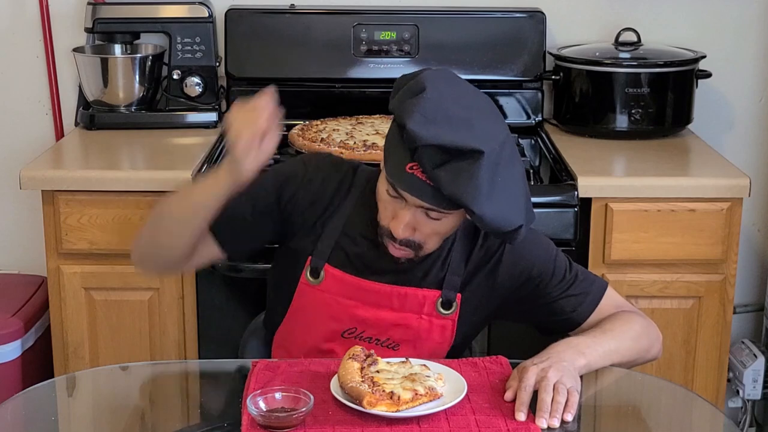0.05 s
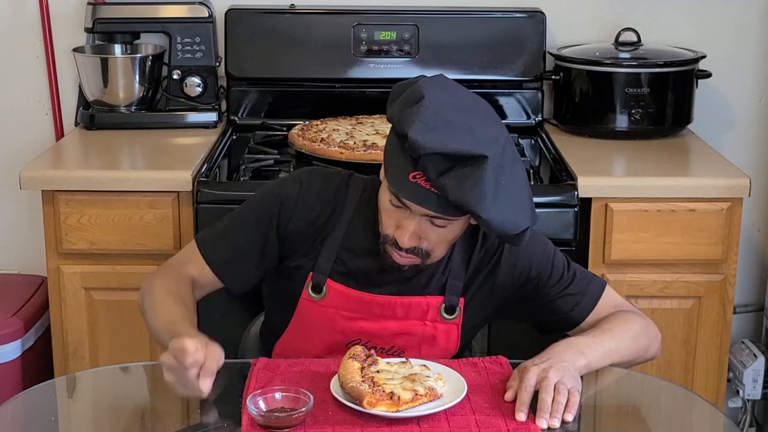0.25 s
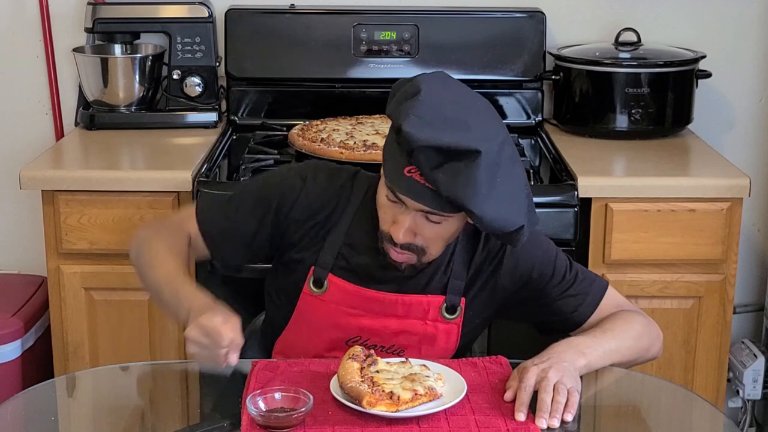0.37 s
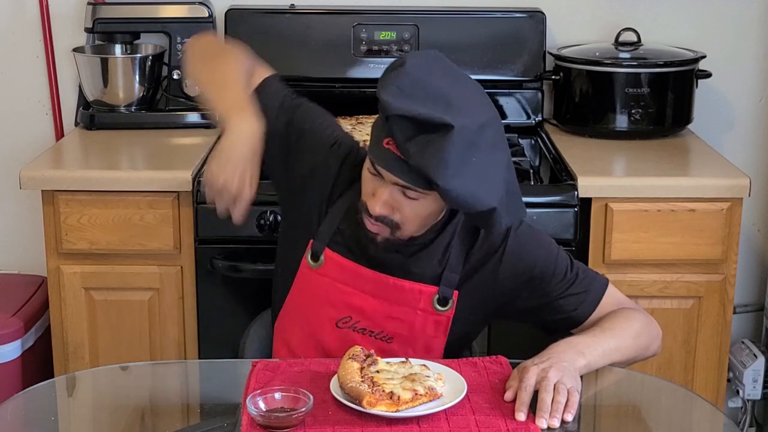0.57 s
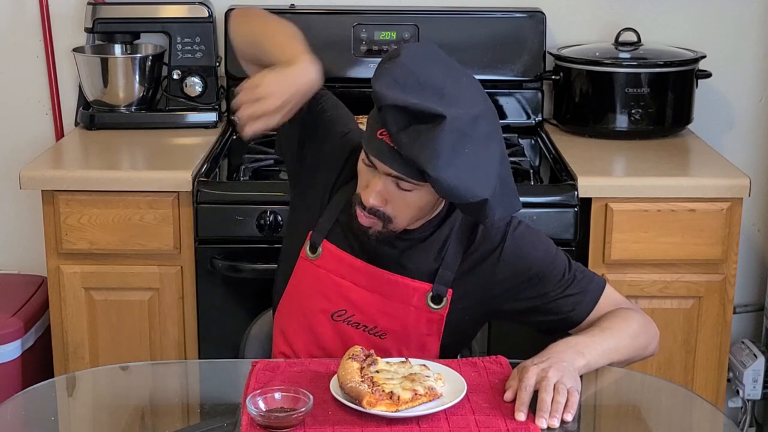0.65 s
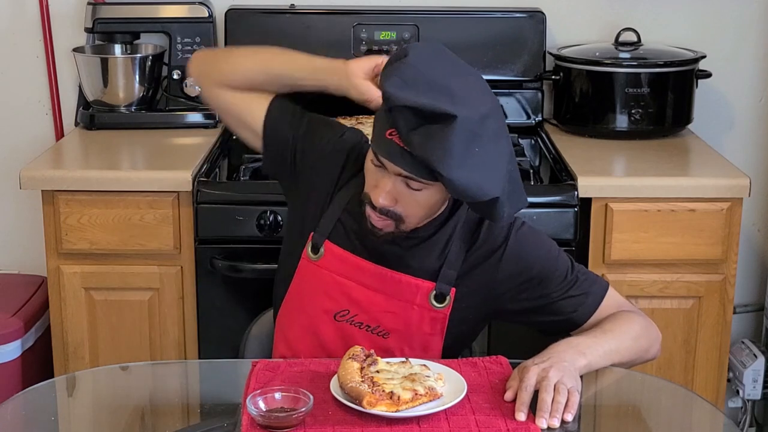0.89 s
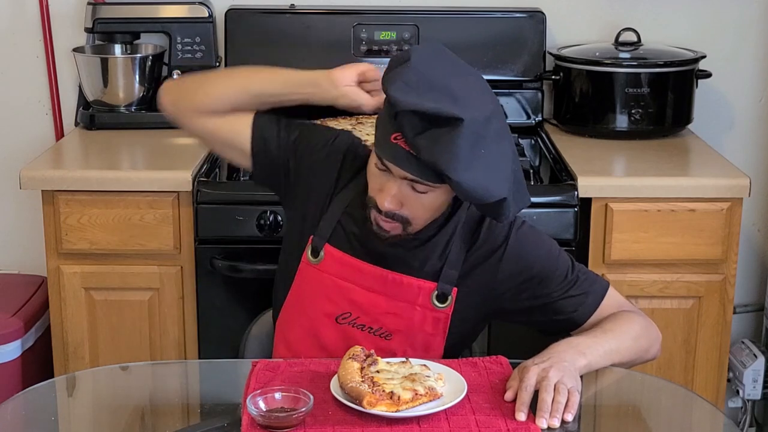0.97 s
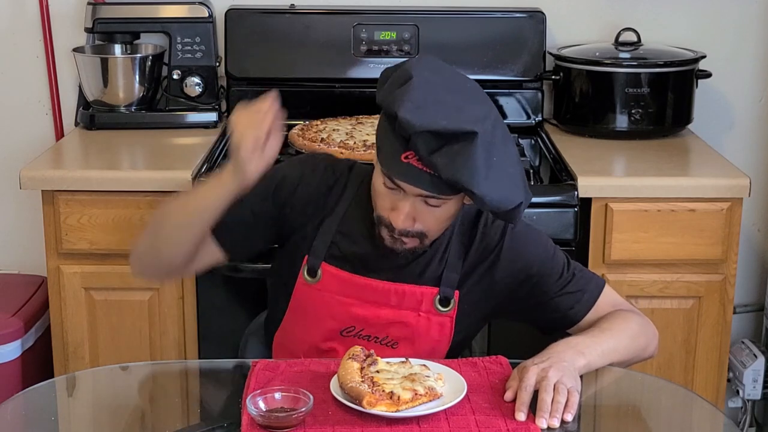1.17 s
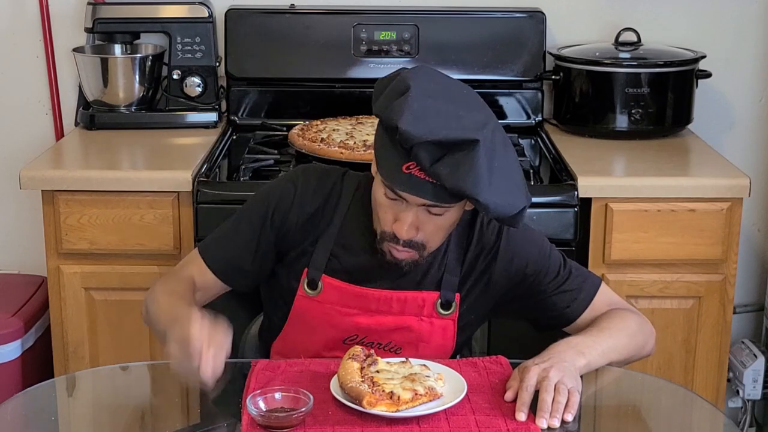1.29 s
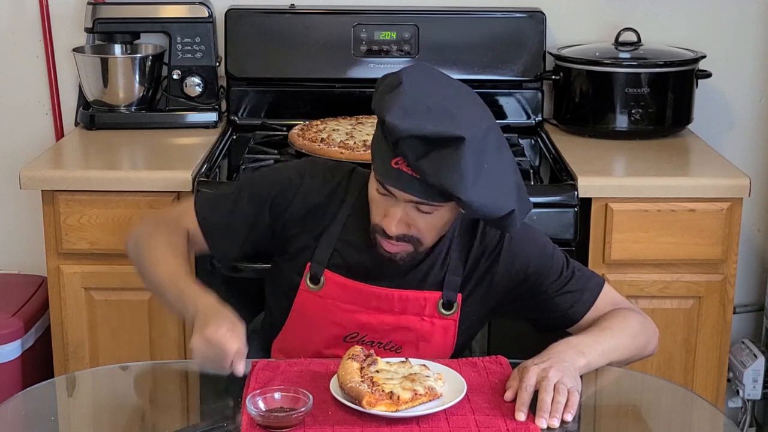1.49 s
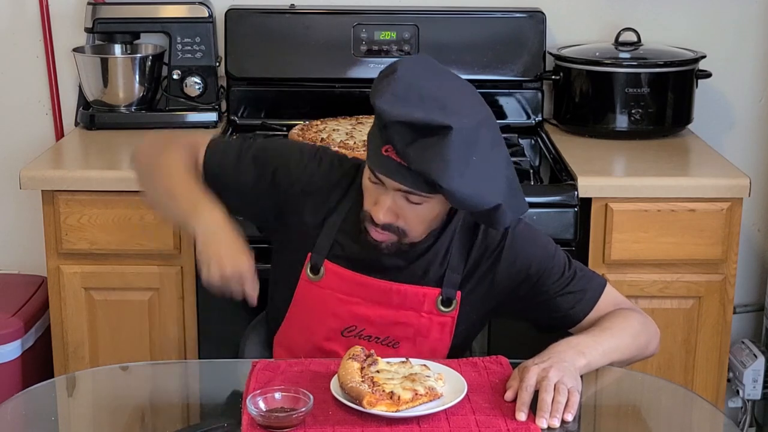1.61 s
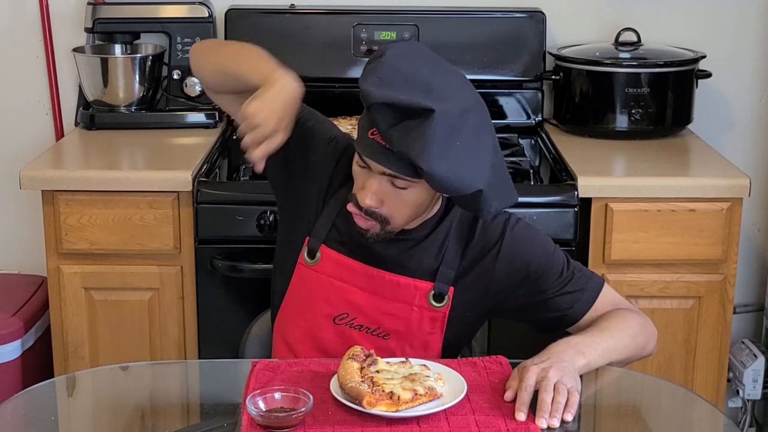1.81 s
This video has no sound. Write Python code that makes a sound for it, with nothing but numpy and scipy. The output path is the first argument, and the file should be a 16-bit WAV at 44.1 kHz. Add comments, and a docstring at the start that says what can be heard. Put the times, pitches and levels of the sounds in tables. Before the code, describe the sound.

A fist hits a glass tabletop hard at about 0.2 seconds, close by. The table booms, and the pane knocks and rattles with the dishes, settling by about 0.7 seconds. A sleeve rustles faintly around 1 second. A second loud blow lands at about 1.3 seconds, its clatter lasting slightly longer and dying near 1.9 seconds. A faint appliance hum runs underneath in the quiet kitchen.

```python
"""An appliance hums in a quiet kitchen; then, close to the stereo microphone, a fist thumps a glass
tabletop twice. Each blow makes the table boom; the pane jumps, knocks on its frame and chatters
with the dishes until it settles. Between the blows a sleeve rustles faintly as the arm is raised.
The room answers briefly, and the loud crashes press into the recorder's limiter."""
import sys
import numpy as np
from scipy import signal
from scipy.fft import rfft, irfft
from scipy.io import wavfile
from scipy.ndimage import uniform_filter1d

SR = 44100
rng = np.random.default_rng(int(sys.argv[2]) if len(sys.argv) > 2 else 0)


def dump_mix(stems):
    """Bounce the given channels to the path in sys.argv[1] as a 16-bit WAV at rate SR."""
    frames = np.atleast_2d(stems).T  # one column per channel
    limited = np.clip(frames, -1, 1)  # hard clip at full scale
    pcm = np.round(limited * 32767).astype(np.int16)
    wavfile.write(sys.argv[1], SR, pcm)


N = 81585
T = np.arange(N) / SR
CONTACT_T60_S = 0.057  # one contact on the glass dies by 60 dB in this time


def amp(db):
    return 10 ** (np.asarray(db) / 20)


def unit_rms(x):
    return x / np.sqrt(np.mean(x ** 2) + 1e-20)


def curve_at(points, hz):
    point_hz, value = np.transpose(points)
    return np.interp(np.log(hz + 1), np.log(point_hz + 1), value)


def decay(t, t60):
    return np.exp(-np.log(1000) * np.maximum(t, 0) / t60) * (t >= 0)


def convolve(x, kernel):
    return signal.fftconvolve(np.atleast_2d(x), np.atleast_2d(kernel), axes=1)[:, :N]


def colour(x, spectrum, size=4096):
    """Causal filter of unit energy with the given spectral shape."""
    log_gain = np.log(amp(curve_at(spectrum, abs(np.fft.fftfreq(size, 1 / SR)))))
    kernel = np.fft.ifft(np.exp(np.conj(signal.hilbert(log_gain)))).real[:size // 2]
    return convolve(x, kernel / np.linalg.norm(kernel))


def stereo_noise(width=0.96, bass_width=0.21, crossover_hz=650):
    """Two channels of noise, alike in the bass and apart in the treble."""
    mid, side = rfft(rng.standard_normal((2, N)))
    hz = np.fft.rfftfreq(N, 1 / SR)
    apart = (width * hz ** 2 + bass_width * crossover_hz ** 2) / (hz ** 2 + crossover_hz ** 2)
    channels = np.array([mid + apart * side, mid - apart * side])
    return irfft(channels / np.sqrt(1 + apart ** 2), N)


def ringing(modes):
    """A struck body: one decaying sine for each mode, summed."""
    return sum(amp(db) * decay(T, t60) * np.sin(2 * np.pi * hz * T) for hz, db, t60 in modes)


def swell(start, db, hz, peak_s):
    """A low vibration that builds up and dies within a few cycles."""
    age = np.maximum(T - start, 0)
    envelope = (age / peak_s * np.exp(1 - age / peak_s)) ** 2
    return amp(db) * envelope * np.sin(2 * np.pi * hz * age)


# Kitchen air all around the microphone. Each row: frequency in Hz, relative spectral level in dB.
AIR_SPECTRUM = [(25, -5), (55, 3), (85, -18.5), (125, -7), (160, -6), (230, -8.5), (480, -7), (600, -13),
                (1000, -18.5), (2500, -25.5), (4000, -32.5), (7000, -32.5), (9000, -45.5), (12000, -38.5),
                (15500, -38)]
# The appliance, faint and central. Each row: frequency in Hz, level in dB.
HUM_TONES = [(43.1, -42), (59.5, -43.5), (119, -41.5), (221, -54), (275, -50), (490, -49)]


def air_and_hum(air_db=-38, waver_depth=0.36):
    """Steady room air and an appliance whose tones waver slowly in level and phase."""
    air_gain = amp(curve_at(AIR_SPECTRUM, np.fft.rfftfreq(N, 1 / SR)))
    air = irfft(rfft(stereo_noise(width=1.0)) * air_gain, N)
    knots = np.linspace(0, T[-1], num=14)
    hum = np.zeros(N)
    for hz, db in HUM_TONES:
        real, imaginary = rng.standard_normal((2, len(knots)))
        waver = 1 + waver_depth * np.interp(T, knots, real + 1j * imaginary)
        tone = np.exp(2j * np.pi * (hz * T + rng.random()))
        hum += amp(db) * unit_rms((waver * tone).real)
    return amp(air_db) * unit_rms(air) + hum


# The fist lands near the microphone. Each row: start in seconds, relative chatter level in dB,
# chatter delay in seconds, its hold in seconds, its sag during the hold in dB per second,
# its settling afterwards in dB per second, sway level in dB.
FIST_BLOWS = [(0.224, 1.5, 0.011, 0.13, 11, 135.5, -12), (1.342, 2, 0.0098, 0.25, 60, 175, -14.5)]


def frame_sway():
    """The table's frame sways under each whole blow."""
    return sum(swell(start, db, hz=50.7, peak_s=0.054) for start, *_, db in FIST_BLOWS)


# Pane and dishes buzzing at close range. Each row: frequency in Hz, relative spectral level in dB.
CHATTER_SPECTRUM = [(100, -7.5), (280, -3.5), (450, 1.5), (600, -1), (730, -10), (1050, -2), (1600, 0),
                    (2000, -1), (2400, 0), (2950, 0), (3500, -8.5), (4200, -7), (5700, -2), (7100, -4.5),
                    (8100, -20), (9000, -18), (16000, -39.5)]
# The sizzle of their finest contacts. Each row: frequency in Hz, relative spectral level in dB.
SIZZLE_SPECTRUM = [(100, -63), (6000, -29), (8000, 0.5), (9000, -13), (9700, -9.5), (12000, 5),
                   (15500, 1.5)]


def chatter(contacts_per_s=700, spread_db=5, build_s=0.016, fine_lag_s=0.0031, fine_fade_db_per_s=36):
    """Pane and dishes buzz in tiny contacts, the finest settling first. Returns buzz and contacts."""
    coarse, fine = np.zeros((2, N))
    for start, db, delay, hold, sag, settle, _ in FIST_BLOWS:
        age = np.maximum(T - start - delay, 0)
        level = amp(db - sag * np.minimum(age, hold) - settle * np.maximum(age - hold, 0))
        coarse += level * np.clip(age / build_s, 0, 1)
        fine += level * np.clip((age - fine_lag_s) / build_s, 0, 1) * amp(-fine_fade_db_per_s * age)
    touches = rng.random(N) < contacts_per_s / SR
    hits = touches * amp(spread_db * np.clip(rng.standard_normal(N), -2, 2))
    power = abs(convolve(hits ** 2, decay(T, CONTACT_T60_S / 2)))
    grainy_noise = unit_rms(np.sqrt(power)) * stereo_noise()
    contacts = grainy_noise * coarse
    sizzle = amp(-17) * colour(grainy_noise * fine, SIZZLE_SPECTRUM)
    return amp(-14) * colour(contacts, CHATTER_SPECTRUM) + sizzle, contacts


# The pane hits its frame, under the fist and as it lands again. Each row: start in seconds,
# thud level in dB, thud pitch in Hz, relative clack level in dB.
PANE_KNOCKS = [(0.236, -10, 124.6, -0.5), (.272, -7, 150.5, 0.5), (0.313, -5.5, 172.4, -13),
               (.333, -17, 182, 2.5), (.371, -7.5, 117.5, -16), (.412, -23.5, 117, -13.5),
               (1.348, -12.5, 124.4, -9), (1.361, -14.5, 138, -3.5), (1.395, -15, 185, 1),
               (1.44, -18, 167.5, -7), (1.468, -19, 122, -5.5), (1.615, -28.5, 122, -12.5),
               (1.681, -32, 119.3, -23)]
THUD_COLUMN, CLACK_COLUMN = 1, 3


def pane_thuds():
    """Each knock thuds at its own pitch."""
    return sum(swell(start, db, hz, peak_s=0.013) for start, db, hz, _ in PANE_KNOCKS)


def knock_train(level_column):
    """An impulse at every knock, with the level given in that column."""
    train = np.zeros(N)
    for knock in PANE_KNOCKS:
        train[round(knock[0] * SR)] += amp(knock[level_column])
    return train


# Bending modes of the table, heard from beside it.
# Each row: frequency in Hz, relative level in dB, time to fall 60 dB in seconds.
TABLE_MODES = [(64.7, 10, 0.17), (114, 1, 0.44), (156.5, -8, 0.28), (183, -32, 0.38), (273.3, -5.5, 0.26),
               (301, 2, 0.38), (438, 0, 0.74), (574, 3, 0.53)]


def table_boom(push_s=0.00081):
    """Each knock is a brief push that bends the table and sets its low modes ringing."""
    push = T * np.exp(-T / (push_s / 4))
    force = convolve(knock_train(THUD_COLUMN), push / push.sum())
    return amp(-14.5) * convolve(force, ringing(TABLE_MODES))


# One hard contact of the pane, close up. Each row: frequency in Hz, relative spectral level in dB.
CLACK_SPECTRUM = [(100, -11), (280, 2.5), (450, 2.5), (720, -9.5), (1000, -1.5), (1500, -2), (1950, 4.5),
                  (2400, -8), (2950, -10), (3500, -15.5), (7000, -16.5), (9000, -25.5), (16000, -23)]


def pane_clacks(rise_s=0.0031):
    """Each knock is a short crack of glass modes, so many that they blur into noise."""
    cracks = np.zeros((2, N))
    for start, _, _, db in PANE_KNOCKS:
        age = T - start
        crack = stereo_noise() * decay(age, CONTACT_T60_S) * np.clip(age / rise_s, 0, 1)
        cracks += amp(db) * crack / np.linalg.norm(crack[0])
    return amp(13) * colour(cracks, CLACK_SPECTRUM)


# Clear tones of the pane and the dishes on it.
# Each row: frequency in Hz, relative level in dB, time to fall 60 dB in seconds.
GLASS_MODES = [(404, -3, .42), (781, -9, .4), (979, -5, .32), (1022, -3, .32), (1296, 6, .34),
               (1368, -5, .2), (1582, 0, .35), (1899, 4.5, .3), (1950, 0, .15), (2000, 3.5, .26),
               (2258, 1.5, .32), (2654, -2.5, .32), (2785, -2.5, .2), (2904, 0, .3)]


def glass_ring(contacts):
    """Knocks and chattering contacts keep the modes of the glass sounding."""
    modes = ringing(GLASS_MODES)
    knocked = amp(10.5) * convolve(knock_train(CLACK_COLUMN), modes / 2)
    chattered = amp(9) * convolve(contacts, modes / np.linalg.norm(modes))
    return amp(-27.5) * (knocked + chattered)


# The kitchen's reverberation at the microphone. Each row: frequency in Hz, time to fall 60 dB in seconds.
KITCHEN_T60 = [(100, 0.41), (500, 0.54), (1500, 0.47), (3000, 0.34), (6000, 0.33), (14000, 0.26)]


def kitchen_reverb(sound, first_reflection_s=0.004):
    """Diffuse reflections, each band dying at its own speed."""
    hz, t, bands = signal.stft(stereo_noise(width=0.74), SR, nperseg=256)
    fading = bands * decay(t, curve_at(KITCHEN_T60, hz)[:, None])
    tail = signal.istft(fading, SR, nperseg=256)[1][:, :N] * (T > first_reflection_s)
    return convolve(sound, tail / np.linalg.norm(tail[0]))


# The arm is raised by the table. Each row: peak time in seconds, level in dB, fade time in seconds.
SLEEVE_BRUSHES = [(0.94, -48, 0.0083), (1.052, -47.5, 0.034)]
# Cloth near the microphone. Each row: frequency in Hz, relative spectral level in dB.
CLOTH_SPECTRUM = [(100, -32), (3000, -20), (4800, 3.5), (8000, -6.5), (15000, -11)]


def sleeve_rustles(rise_share=0.35):
    """Small brushes of cloth that swell quickly and fade."""
    level = sum(amp(db) * np.exp(-np.maximum(T - peak, (peak - T) / rise_share) / fade)
                for peak, db, fade in SLEEVE_BRUSHES)
    return colour(level * stereo_noise(), CLOTH_SPECTRUM)


def scene():
    """At the microphone: the table's boom, the clatter of glass and the kitchen around them."""
    buzz, contacts = chatter()
    clatter = buzz + pane_clacks() + sleeve_rustles()
    boom = frame_sway() + pane_thuds() + table_boom()
    ring = glass_ring(contacts)
    room = kitchen_reverb(amp(0.5) * clatter + amp(-10) * boom + amp(-8) * ring)
    pan = amp([[-0.44], [0.44]])  # a touch to the right
    return air_and_hum() + pan * (clatter + boom + ring + room)


def record(dry, low_cut_hz=40, limit_db=-7, recover_db_per_s=90, knee=0.95, top_hz=15750):
    """The recorder: low cut, a limiter that holds crashes down and rounds their peaks, band limit."""
    dry = signal.sosfilt(signal.butter(2, low_cut_hz, "high", fs=SR, output="sos"), dry)
    power = uniform_filter1d((dry ** 2).mean(0), size=300)
    power_db = 10 * np.log10(abs(power) + 1e-12)
    recovery_db = T * recover_db_per_s
    peak_db = np.maximum.accumulate(power_db + recovery_db) - recovery_db  # jumps up, sinks steadily
    over_db = np.maximum(peak_db - limit_db, 0)
    held = dry / amp(uniform_filter1d(over_db, size=100))
    linear = np.clip(held, -knee, knee)
    rounded = linear + (1 - knee) * np.tanh((held - linear) / (1 - knee))
    low_pass = signal.firwin(511, top_hz, window=("kaiser", 8), fs=SR)
    return signal.oaconvolve(rounded, low_pass[None], "same")


dry = scene()
out = record(dry)
dump_mix(out)
```